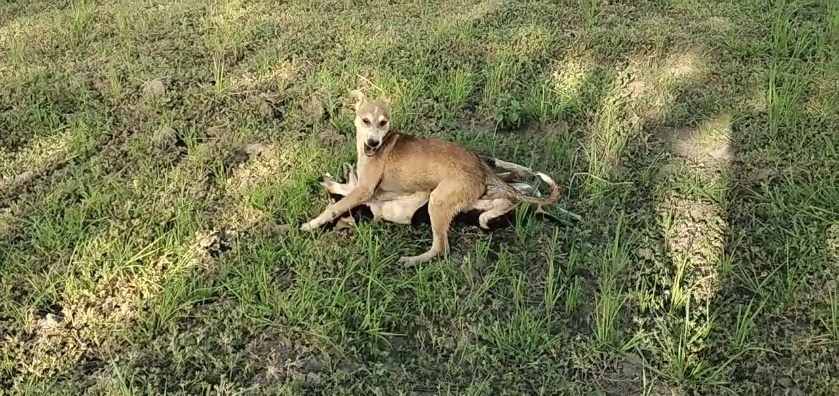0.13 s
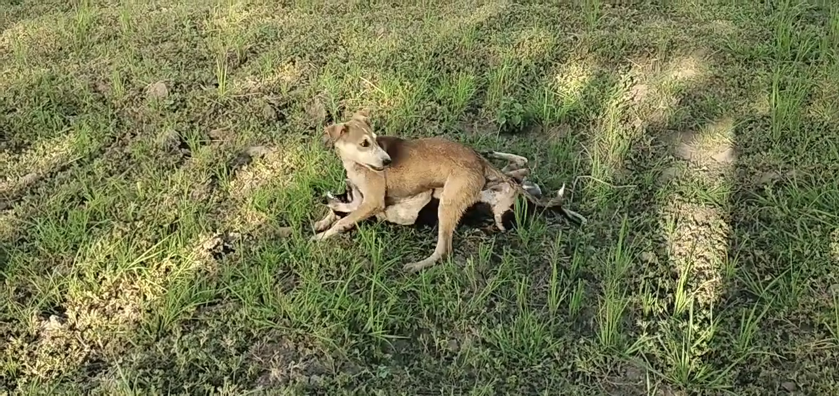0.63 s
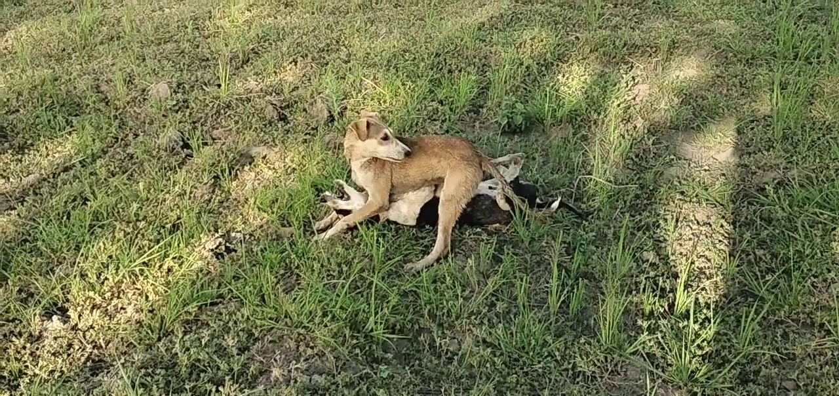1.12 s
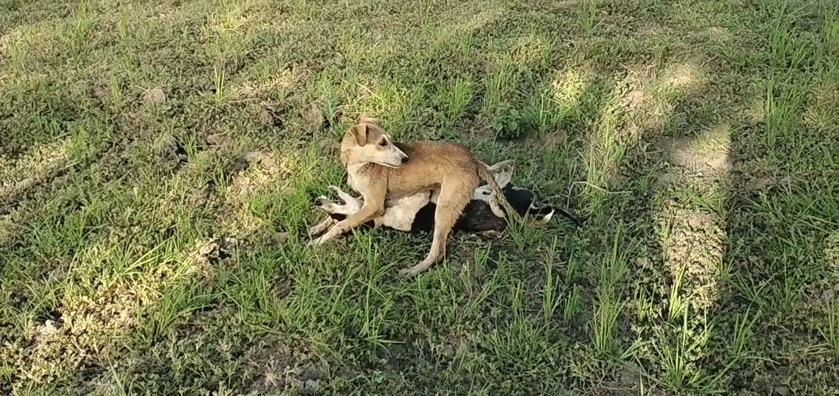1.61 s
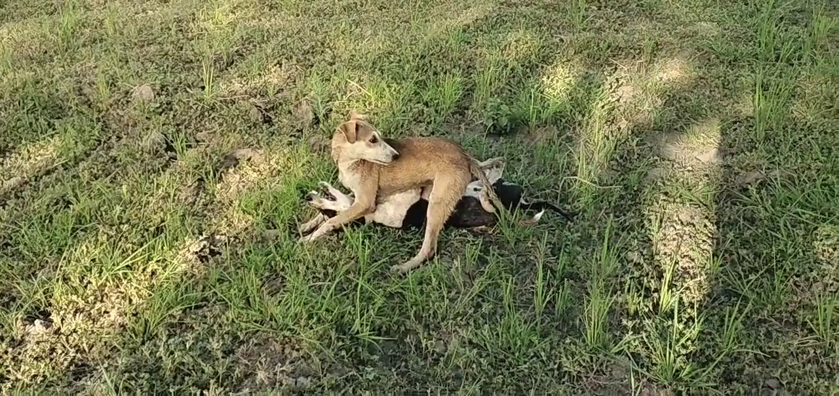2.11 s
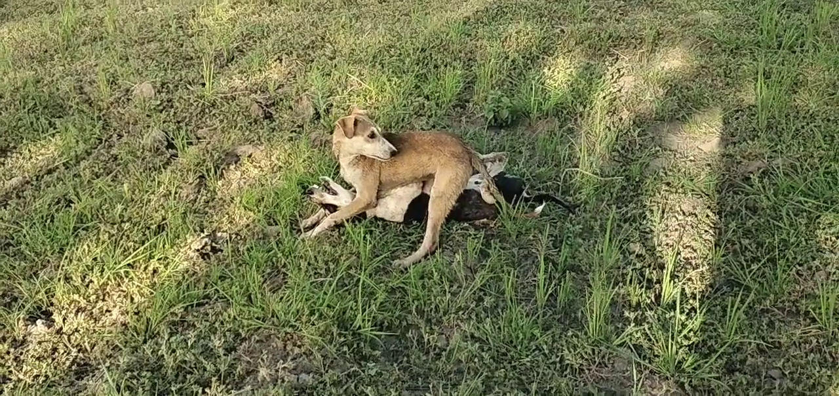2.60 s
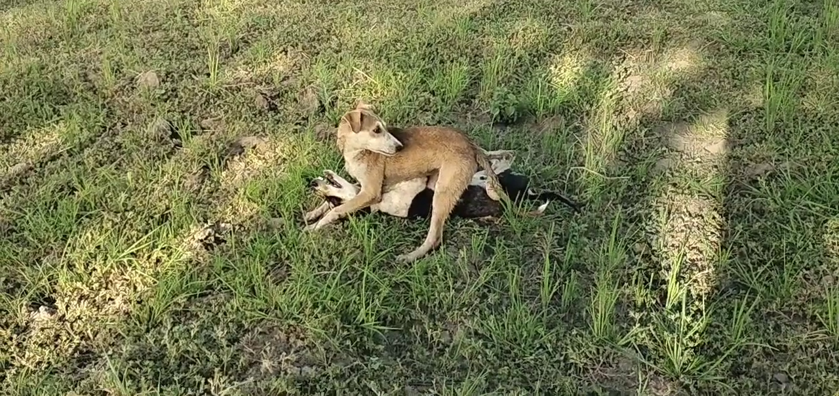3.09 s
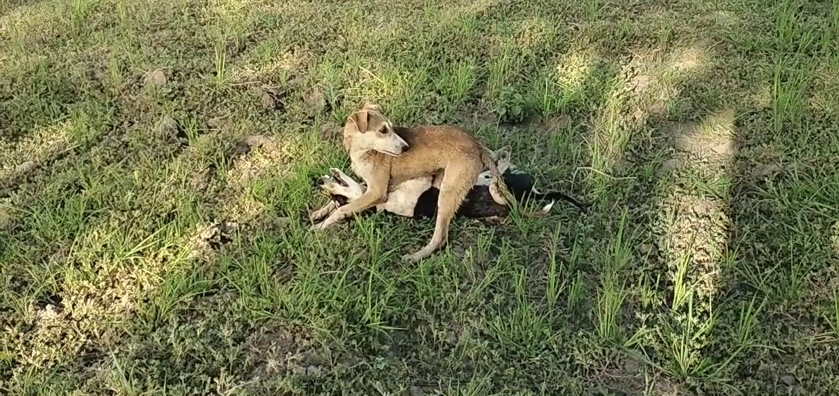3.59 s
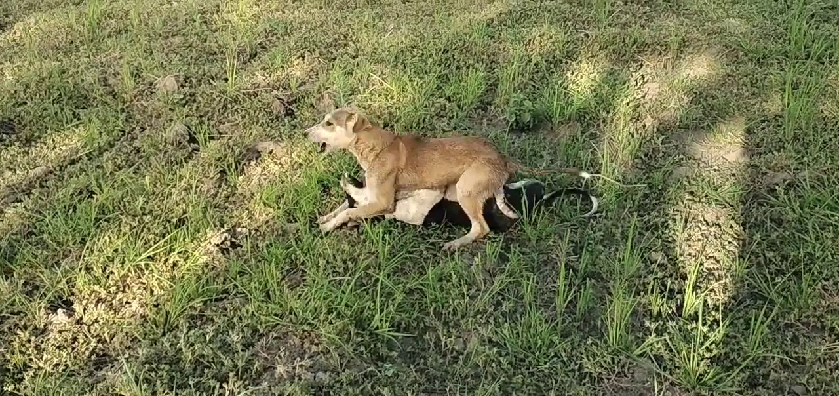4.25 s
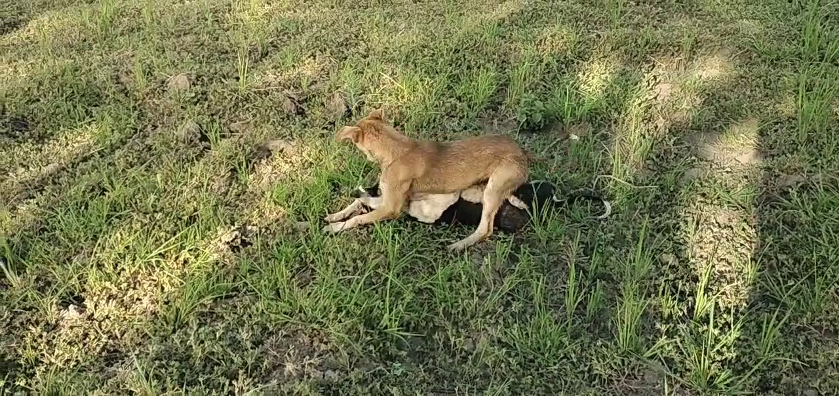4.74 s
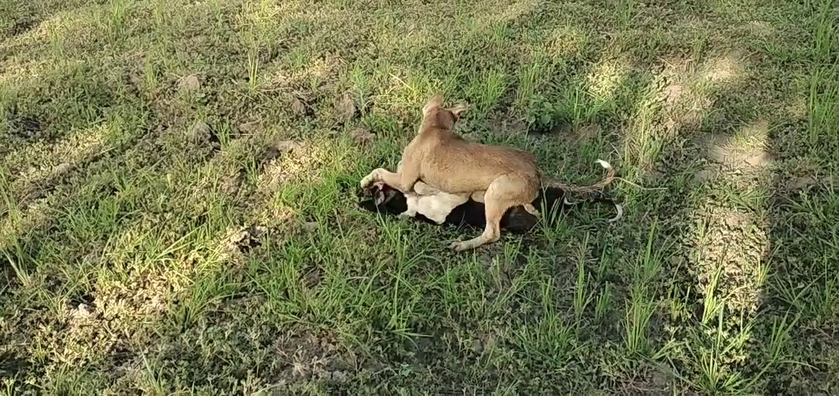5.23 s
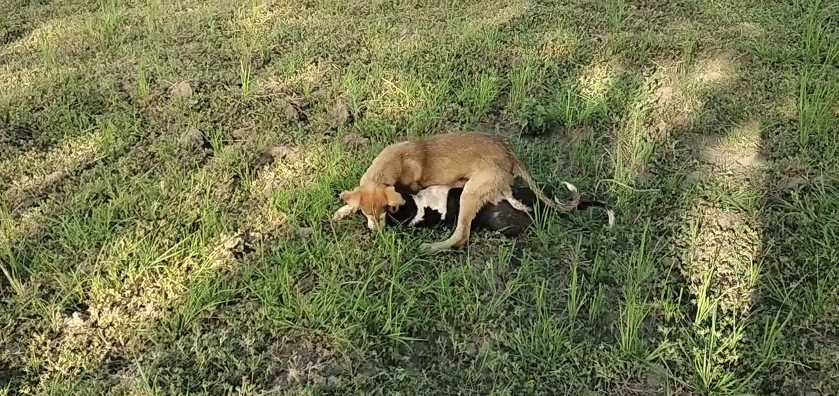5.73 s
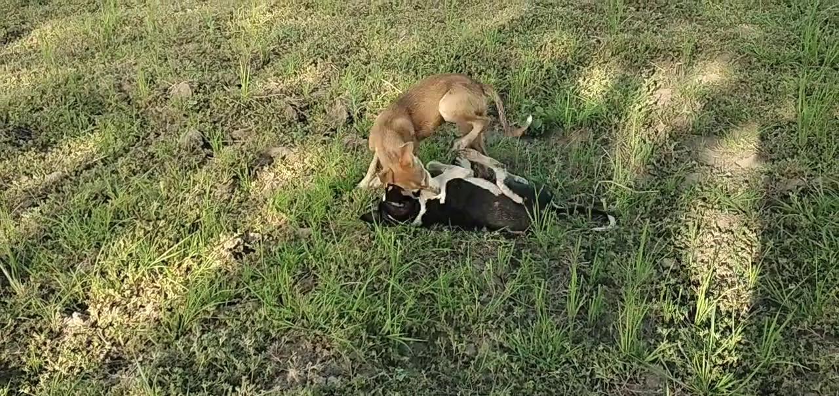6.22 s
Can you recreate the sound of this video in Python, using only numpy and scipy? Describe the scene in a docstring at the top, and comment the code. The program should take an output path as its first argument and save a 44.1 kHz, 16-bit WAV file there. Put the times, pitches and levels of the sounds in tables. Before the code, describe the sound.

Quiet open-air hum, faint twitter, thin insect buzz and a soft engine puttering about four times a second run throughout. A brief coo comes at 0.1 s. At 0.55 s a young dog close by gives a shrill raspy squeal, then short choked yelps sliding down until 1.1 s, with a small upward break at the end; near walls slap it back. From 1.4 to 2.7 s there are dry grass ticks and quick high bird chips, the sharpest at 2.6 s. The squeal phrase repeats at 2.97-3.7 s, brighter, with another coo inside it. A short click sounds at 4.4 s, a grass tick at 4.65 s. The third and loudest phrase runs 4.66-5.4 s, its echo fading. Soft coos recur roughly every second. Small bumps follow, and a fainter raspy call rises at about 6.05-6.25 s.

```python
"""Shrill squeal between near walls

Close to the microphone a shrill two-voiced squeal repeats one phrase three times and rings off near walls, with
a faint dull tail from farther off. It is built from sine partials on gliding pitches, with rasp, breath and brief
catches. Dry ticks of noise in the grass, bird chips, low wind bumps and short clicks of decaying tones, soft
cooing glides and an engine's puffs of noise share the echoes.
Farther off a fainter caller answers and thin chirps glide; noise bands make twitter, insects and country air.
"""
import sys
import numpy as np
from scipy import signal
from scipy.io import wavfile
from scipy.ndimage import uniform_filter1d

SR = 44100
rng = np.random.default_rng(int(sys.argv[2]) if len(sys.argv) > 2 else 0)


def gain_from_db(level_db):
    """Turn a decibel level (scalar or array-like) into a linear amplitude factor."""
    decades = np.asarray(level_db, float) / 20
    return 10 ** decades


def output_pcm(signal):
    """Save a mono or channel-first signal as 16-bit PCM at the path in sys.argv[1].

    Samples are clipped to [-1, 1] before scaling.
    """
    pcm = np.clip(np.atleast_2d(signal).T, -1, 1) * 32767
    wavfile.write(sys.argv[1], SR, np.round(pcm).astype(np.int16))


N = 278712   # samples


def at_hz(points, hz):
    """Reads a spectrum on a log-frequency axis."""
    point_hz, value = np.transpose(points)
    return np.interp(np.log(hz), np.log(point_hz), value)


def band(x, low_hz, high_hz):
    """Second-order Butterworth band-pass."""
    return signal.sosfilt(signal.butter(2, [low_hz, high_hz], "band", fs=SR, output="sos"), x)


def resonate(x, hz, width_hz):
    """One two-pole resonance, gain about 1 on top."""
    r = np.exp(-np.pi * width_hz / SR)
    poles = [1, -2 * r * np.cos(2 * np.pi * hz / SR), r * r]
    return signal.lfilter([(1 - r * r) / 2, 0, (r * r - 1) / 2], poles, x)


def rms_one(x):
    """Scales to unit rms."""
    return x / np.sqrt(np.mean(x ** 2) + 1e-20)


def drift(rate_hz):
    """Random wander of unit rms: noise through a double low-pass at rate_hz."""
    r = np.exp(-2 * np.pi * rate_hz / SR)
    noise = rng.standard_normal(N + SR)
    settled = signal.lfilter([1], [1, -2 * r, r * r], noise)[SR:]
    return rms_one(settled)


def unroll(note, fade_s, release_s):
    """A note's sample indices, its columns in time and its rounded ends."""
    s, *columns = np.transpose(note)
    at = np.arange(round(s[0] * SR), min(round(s[-1] * SR), N))
    ends = np.clip(np.minimum((at - at[0]) / fade_s, (at[-1] - at) / release_s) / SR, 0, 1)
    return at, [np.interp(at / SR, s, c) for c in columns], np.sin(np.pi / 2 * ends) ** 2


RASP_BEAT_HZ = 147.5   # the two voices beat
WAVER, CATCH_WAVER = .0025, .0012   # pitch waver as a share, and what each dB of mean dip adds
CATCH_ROUGH = 0.022   # added roughness per dB of dip
CATCH_BREATH, CATCH_SPAN_S = 1.6, 0.014   # dB more air per dB of mean dip, over this span
# throat and mouth colour every partial: (f/Hz, level/dB)
THROAT = [(1000, -4), (1300, -5.5), (1600, -7), (2100, 6.5), (2400, 3.5), (2650, -2), (3100, -1),
          (3500, -5.5), (3900, 0), (4700, -14), (5200, -12), (6500, -14), (7100, -10), (7900, -14),
          (8500, -28.5), (9100, -30.5), (10000, -47), (12000, -36), (16000, -37)]
# the head points another way in each phrase: (phrase start t/s, its colour as (f/Hz, level/dB))
FACING = [(.5, [(1300, 1), (2600, 1), (3900, -5.5), (5200, 1), (7000, 0.5), (11000, -3)]),
          (2.9, [(1300, 2.25), (2600, 3.2), (3900, 3), (5200, 3.7), (7000, 1.5), (11000, 1.5)]),
          (4.6, [(1300, -8), (2600, 1.5), (3900, 3.3), (5200, 6.5), (7000, -5), (11000, 1.5)])]


def voice(notes, partials_db, rough, breath_db, fade_s, dip_db, shift_hz=0, beat=0):
    """Twelve partials on a wavering pitch; roughness scatters each, the beat throbs the upper ones most."""
    out, waver = np.zeros(N), drift(110)
    scatter = np.array([drift(383) for k in range(4)])
    hiss = band(rng.standard_normal(N), 2500, 6400)
    sheen = band(rng.standard_normal(N), 9500, 20000)
    breath = rms_one(hiss + 0.091 * sheen)
    # a run of catches lets more air through
    strain_db = uniform_filter1d(dip_db, round(CATCH_SPAN_S * SR))
    for note in notes:
        at, (hz, db, tilt_db, first_db), ends = unroll(note, fade_s, release_s=.007)
        facing = [colour for start_s, colour in FACING if start_s < note[0][0]][-1]
        levels_db = []
        for k in range(1, 13):
            weight_db = tilt_db * np.log2(min(k, 6) / 2) if k > 1 else first_db
            colour_db = at_hz(THROAT, k * hz) + at_hz(facing, k * hz)
            levels_db.append(db + partials_db[min(k, 6) - 1] + weight_db + colour_db)
        # a choked voice sags in pitch
        bend = (WAVER - CATCH_WAVER * strain_db[at]) * waver[at] + 0.00676 * dip_db[at]
        turns = np.cumsum(hz * (1 + bend)) / SR
        throb = np.cos(2 * np.pi * np.cumsum(RASP_BEAT_HZ * (1 + 0.033 * waver[at])) / SR)
        for k, level_db in enumerate(levels_db, 1):
            # in the rasp the upper partials hold still, below the first voice's series
            cycles = (k * hz.mean() + shift_hz) * at / SR if shift_hz and k > 2 else k * turns
            share = (min(k, 3) / 3) ** 2   # the lowest partials stay cleanest
            jitter = (rough - CATCH_ROUGH * dip_db[at]) * share * scatter[k % 4, at]
            phase = 2 * np.pi * (cycles + rng.random()) + jitter
            swell = 1 + beat * share * throb + rough * share * scatter[(k + 1) % 4, at]
            swell = swell / np.sqrt(1 + (beat * share) ** 2 / 2 + (rough * share) ** 2)
            audible = k * hz < .45 * SR
            out[at] += np.sqrt(2) * gain_from_db(level_db + dip_db[at]) * audible * ends * swell * np.sin(phase)
        # air rushes with the upper partials, in puffs on the beat
        air_db = np.max(levels_db[2:5], axis=0) + breath_db + 0.22 * dip_db[at] - CATCH_BREATH * strain_db[at]
        out[at] += gain_from_db(air_db) * ends * (1 + beat * throb) * breath[at]
    return out


# first voice, clear notes, as breakpoints: (t/s, pitch f/Hz, level/dB before the throat and facing colours,
# tilt from partial 2 to 6 in dB per octave, weight of the fundamental level/dB)
LOW_VOICE = [
    [(.547, 1388, -45, 1.5, 1), (.555, 1400, -44.5, 1, -1.5), (.565, 1436, -39, 1, -1)],
    [(.708, 1303, -47.5, 0, -1), (.736, 1361, -47.5, 2, 1), (.768, 1301, -48.5, 0, 1.5),
     (.782, 1290, -65, -8, -7)],
    [(.853, 1329, -45, 0, -2.5), (.889, 1307, -50, 2.5, 5), (.909, 1264, -50, -2.5, 2),
     (.933, 1221, -47, -12, -4.5), (.96, 1126, -51, 0, -5), (.994, 1003, -56, -17, -5),
     (1.002, 1020, -66, -5, -8)],
    [(2.974, 1394, -44.5, -2, -4), (2.982, 1385, -46.5, 6.5, 4.5), (2.988, 1430, -41, 0, 8)],
    [(3.206, 1337, -42.5, 0, -2), (3.238, 1297, -47, 4, 1.5), (3.248, 1270, -43.5, -4, -4.5),
     (3.255, 1290, -47, 2, -17)],
    [(3.334, 1298, -46, 1.5, 0), (3.394, 1313, -44.5, 0, 2.5), (3.404, 1336, -50, 0, 0.5),
     (3.416, 1256, -35, -5, -14)],
    [(3.495, 1271, -42, -4, -3), (3.537, 1197, -43, -7, -6), (3.551, 1174, -40.5, -11, -5.5),
     (3.585, 1052, -49, -7, 0), (3.598, 1032, -40, -20, -1)],
    [(4.662, 1450, -32.5, 1, -14), (4.668, 1410, -37, 1, 5), (4.678, 1370, -30.5, -5.5, -2)],
    [(4.901, 1291, -37, -0.5, -2), (4.921, 1289, -33, 0, -2), (4.931, 1266, -32.5, -4, -12),
     (4.946, 1232, -39, 2.5, 6.5)],
    [(5.026, 1309, -32, -3, -2.5), (5.094, 1266, -36, 0, -2), (5.106, 1294, -35, -2, -7),
     (5.115, 1255, -41, 0, 15)],
    [(5.194, 1265, -33, -4, 1.5), (5.206, 1231, -35, -2, -1.5), (5.224, 1203, -31.5, -7, -3),
     (5.245, 1156, -33, -10, -10), (5.257, 1138, -39, 1, -6.5), (5.283, 1050, -38.5, -20, 3.5),
     (5.295, 995, -36.5, -25, -4.5)],
]
# second voice, overlapping the ends of notes: the same columns, before HIGH_PARTIALS too
HIGH_VOICE = [
    [(.595, 1690, -33.5, -7, -43), (.605, 1790, -42.5, 0, -28), (.613, 1730, -29, -14, -40)],
    [(.96, 1269, -59, -3, -18), (.975, 1280, -70, 2, -15), (1.004, 1256, -69, 4, 6),
     (1.02, 1295, -57, 4, -1), (1.05, 1473, -55, -8, 5.5), (1.066, 1646, -53.5, 13.5, -7),
     (1.078, 1666, -48, 8, -7)],
    [(3.052, 1840, -48, 9, -22), (3.06, 1813, -34.5, 5, -15), (3.066, 1794, -41.5, 4, -2.5),
     (3.07, 1805, -43, -3, -22)],
    [(3.56, 1305, -64, 7, -21), (3.6, 1174, -65.5, 4, 9.5), (3.612, 1304, -73, 4, 19.5),
     (3.63, 1313, -48, -20, -10), (3.668, 1576, -46.5, 4, 4.5), (3.68, 1645, -44, 9, 2),
     (3.696, 1536, -61, 2, -14)],
    [(4.747, 1790, -47, 13, -9), (4.753, 1835, -32, 5, -13), (4.759, 1788, -28.5, 12, -12.5),
     (4.764, 1765, -38, -6, 20)],
    [(5.255, 1416, -43, -12.5, -27.5), (5.299, 1269, -51.5, -13, 15.5), (5.309, 1263, -63.5, 1, 20),
     (5.32, 1278, -54.5, -3, 21), (5.332, 1302, -48.5, -11, -1), (5.348, 1438, -35, -17, 10),
     (5.36, 1530, -48, 13, 21), (5.372, 1629, -39.5, 21.5, -37), (5.386, 1540, -39.5, -9, -19),
     (5.392, 1580, -43, -5, 0)],
]
# the raspy body of each opening note: the same columns, before RASP_PARTIALS too
RASP = [
    [(.56, 1420, -41, -3, -3), (.572, 1466, -45.5, 2, 3), (.596, 1489, -56.5, 12, 8),
     (.61, 1417, -31.5, -13, -6)],
    [(2.984, 1425, -35, -3, -1), (2.996, 1456, -39.5, -2.5, -1), (3.018, 1489, -35.5, 0.5, -1),
     (3.044, 1534, -45.5, 9, 8), (3.058, 1508, -47, 13.5, 10)],
    [(4.673, 1384, -19, -7.5, 3), (4.681, 1491, -37, 6, 10), (4.693, 1498, -30, 1.5, 9),
     (4.731, 1481, -33.5, 6.5, 13), (4.756, 1568, -43.5, 17.5, 22)],
]
# what each adds to its partials 1 to 6, the sixth holding for all above: (level/dB)
HIGH_PARTIALS = [10, 0.86, -2, -3, -20.5, -25]
RASP_PARTIALS = [-3.5, 1.5, -7, -2, -0.8, -1.5]
# quick runs of catches at the start of notes: (first t/s, last t/s, first dip level/dB, last dip level/dB)
CATCHES = [(0.718, 0.761, -17.5, -13), (0.862, 0.908, -16.5, -12.5), (3.216, 3.229, -29.5, -10.5),
           (3.346, 3.386, -20.5, -15.5), (3.502, 3.52, -14.5, -17), (4.912, 4.923, -20, -10.5),
           (5.036, 5.08, -21, -12), (5.203, 5.212, -3.5, -11.5)]
CATCH_S, CATCH_EVERY_S = 0.0031, .013
CLEAR_ROUGH, CLEAR_BREATH_DB = .15, -28.0


def squeal():
    """Both voices and the rasp; the catches choke the first voice for a few milliseconds."""
    t, dip_db, steady = np.arange(N) / SR, np.zeros(N), np.zeros(N)
    for first_s, last_s, first_db, last_db in CATCHES:
        count = round((last_s - first_s) / CATCH_EVERY_S) + 1
        for s, db in np.linspace((first_s, first_db), (last_s, last_db), count):
            near = slice(round((s - .01) * SR), round((s + .01) * SR))
            # it sinks slowly and snaps back
            width_s = np.where(t[near] < s, CATCH_S, CATCH_S / 3)
            dip_db[near] += db * np.exp(-((t[near] - s) / width_s) ** 2)
    low = voice(LOW_VOICE, np.zeros(6), rough=CLEAR_ROUGH, breath_db=CLEAR_BREATH_DB, fade_s=.0006,
                dip_db=dip_db)
    high = voice(HIGH_VOICE, HIGH_PARTIALS, rough=CLEAR_ROUGH, breath_db=CLEAR_BREATH_DB, fade_s=0.0013,
                 dip_db=steady)
    # the rasp's upper partials sit flat
    rasp = voice(RASP, RASP_PARTIALS, rough=.6, breath_db=-2.0, fade_s=0.0064, dip_db=steady,
                 shift_hz=-480.0, beat=.45)
    # the voices keep little below about 900 Hz
    return signal.sosfilt(signal.butter(4, 900, "high", fs=SR, output="sos"), low + high + rasp)


# dry ticks in the grass: (t/s, onset level/dB, low edge f/Hz, high edge f/Hz)
TICKS = [(1.426, -65, 3530, 9300), (1.454, -70, 3400, 9500), (1.607, -71.5, 6000, 9350),
         (1.676, -63.5, 2920, 8800), (2.094, -62.5, 3430, 8400), (2.559, -69, 2800, 5500),
         (4.112, -71, 2480, 4470), (4.649, -52.5, 1010, 4400), (5.99, -73, 9900, 15000)]


def ticks():
    """Each tick is a burst of band-passed noise that dies within some 35 milliseconds."""
    out, t = np.zeros(N), np.arange(SR // 20) / SR
    for s, db, low_hz, high_hz in TICKS:
        grit = band(band(rng.standard_normal(len(t)), low_hz, high_hz), low_hz, high_hz)
        out[round(s * SR):][:len(t)] += gain_from_db(db - 60 * t / 0.035) * rms_one(grit)
    return out


def pips(events):
    """Short tones that swell in a millisecond or two and die, sagging in pitch."""
    out, t = np.zeros(N + SR), np.arange(SR // 5) / SR
    for s, db, hz, t60 in events:
        shape = (1 - np.exp(-t / 0.0015)) * gain_from_db(-60 * t / max(t60, .004))
        tone = np.sin(2 * np.pi * hz * t * (1 - 1.4 * t))
        out[round(s * SR):][:len(t)] += gain_from_db(db) * shape / shape.max() * tone
    return out[:N]


# small bird chips: (t/s, peak level/dB, starting f/Hz, 60 dB decay t/s)
CHIPS = [(1.552, -68, 3770, 0.028), (1.5783, -56.5, 3860, 0.041), (1.8552, -62, 3840, 0.066),
         (1.8811, -56.5, 3870, 0.029), (2.1485, -61, 3720, 0.058), (2.176, -55, 3900, 0.04),
         (2.4314, -67, 3730, 0.04), (2.4578, -61, 3740, 0.034), (2.4838, -53, 3860, 0.034),
         (2.603, -42.5, 3810, 0.013), (2.6848, -70, 4570, 0.026), (2.7162, -70, 6950, 0.034)]


def chips():
    """Small birds chip: high tones that decay fast."""
    return pips(CHIPS)


# soft low wind bumps near 250-310 Hz and short clicks near 1.3 kHz:
# (t/s, peak level/dB, starting f/Hz, 60 dB decay t/s)
BUMPS_AND_CLICKS = [(2.274, -64, 243, 0.067), (3.67, -69, 249, 0.24), (3.755, -63, 286, 0.025),
                    (4.374, -69.5, 1317, 0.028), (4.394, -42.5, 1325, 0.016), (4.419, -64, 1270, 0.024),
                    (5.36, -61.5, 243, 0.061), (5.415, -57, 284, 0.017), (5.785, -52, 313, 0.0095),
                    (5.809, -55.5, 1440, 0.042)]


def bumps_and_clicks():
    """Soft low wind bumps and short clicks, each one decaying tone."""
    return pips(BUMPS_AND_CLICKS)


def arcs(calls, swell, start_hz=None):
    """Each call swells to its top and sinks; pitch glides straight, or scoops up from start_hz first."""
    share, start_db, end_db = swell
    notes = []
    for s, length, a_hz, last_hz, db in calls:
        top_hz = a_hz if start_hz else a_hz + share * (last_hz - a_hz)
        notes.append([(s, start_hz or a_hz, db + start_db),
                      (s + share * length, top_hz, db),
                      (s + length, last_hz, db + end_db)])
    return notes


def whistles(notes, rough, fade_s):
    """Near sines, blurred by distance: phase and level wander at random."""
    out, blur, sway = np.zeros(N), drift(150), drift(49)
    for note in notes:
        at, (hz, db), ends = unroll(note, fade_s, fade_s)
        phase = 2 * np.pi * np.cumsum(hz) / SR + rough * blur[at]
        sway_db = 4.0 * rough * sway[at]
        out[at] += np.sqrt(2) * gain_from_db(db + sway_db) * ends * np.sin(phase)
    return out


# soft coos: (start t/s, length t/s, f/Hz at the loudest, last f/Hz, top level/dB before the sway)
COOS = [(.11, 0.056, 986, 960, -53.5), (1.24, 0.058, 987, 1100, -55), (2.31, 0.052, 986, 1090, -56),
        (3.41, 0.049, 990, 1030, -52), (4.43, .055, 980, 1060, -55.5), (5.83, 0.057, 975, 960, -55)]
# (share of the length to the top, start level/dB, end level/dB), levels against the top
COO_SWELL = (.65, -20, -9)


def coos():
    """Soft coos: near sines that scoop up in pitch as they swell."""
    return whistles(arcs(COOS, COO_SWELL, start_hz=860), rough=0.19, fade_s=0.0035)


# how loud the engine arrives: (t/s, chuff level/dB, thump level/dB), both before trims and spread
FIRINGS = [(.2, -51.5, -58), (.44, -51.5, -71), (.67, -52, -59.5), (.9, -59, -63), (1.12, -48.5, -61.5),
           (1.599, -57.5, -68.5), (2.1, -51, -62), (2.5, -56, -61.5), (2.9, -63.5, -71), (3.4, -43.5, -72),
           (3.7, -54, -53), (4.06, -52.5, -74.5), (4.5, -50, -68), (5.1, -53.5, -67.5), (5.4, -47.5, -62.5),
           (5.65, -54, -62), (6.1, -51, -66)]
# exhaust resonances: (f/Hz, width f/Hz, relative level/dB)
EXHAUST = [(1840, 410, 12.5), (2213, 540, 4.5), (2790, 193, 8), (4290, 1200, -47.5)]
FIRST_FIRING_S, FIRING_EVERY_S = .2135, .2259
CHUFF_S, THUMP_S, THUMP_SPREAD_DB = .0055, .0079, 3.5   # times to the top, and chance from firing to firing


def engine():
    """Each firing puffs noise through the exhaust and pushes a low lumpy thump."""
    chuff, thump, t = np.zeros(N + SR), np.zeros(N + SR), np.arange(SR // 4) / SR
    when, chuffs_db, thumps_db = np.transpose(FIRINGS)
    for s in np.arange(FIRST_FIRING_S, N / SR, FIRING_EVERY_S):
        chuff_db = np.interp(s, when, chuffs_db) - 2.5
        thump_db = np.interp(s, when, thumps_db) + THUMP_SPREAD_DB * rng.standard_normal() + 2.0
        here = slice(round(s * SR), round(s * SR) + len(t))
        chuff[here] += gain_from_db(chuff_db) * t / CHUFF_S * np.exp(1 - t / CHUFF_S)
        push = np.sin(2 * np.pi * (rng.uniform(80, 116.6) * t + rng.random()))
        thump[here] += gain_from_db(thump_db) * t / THUMP_S * np.exp(1 - t / THUMP_S) * push
    puff = band(band(rng.standard_normal(N), 1200, 4600), 1200, 5000)
    # neighbouring resonances take opposite signs
    pipe = rms_one(sum(gain_from_db(db) * resonate(puff, hz, width) * (-1) ** k
                       for k, (hz, width, db) in enumerate(EXHAUST)))
    lumps = gain_from_db(5.8 * drift(29))
    return chuff[:N] * pipe + thump[:N] * lumps


# the fainter caller's strong partial: (start t/s, length t/s, first f/Hz, last f/Hz, top level/dB before the sway)
FAR_CALLS = [(.39, 0.035, 2785, 2680, -69.5), (.49, 0.072, 2797, 2910, -68),
             (1.48, 0.17, 2900, 2830, -77.5), (2.83, 0.057, 2810, 2895, -71), (4.1, .09, 2560, 2240, -76),
             (5.73, 0.055, 2730, 2800, -69), (6.065, 0.19, 2726, 3020, -60)]
# (share of the length to the top, start level/dB, end level/dB), levels against the top
FAR_SWELL = (.6, -7, -6)


def far_calls():
    """The fainter caller's strong partial: a gliding near sine, heavily blurred by distance."""
    return whistles(arcs(FAR_CALLS, FAR_SWELL), rough=.75, fade_s=0.0074)


# the fainter caller's rasp: (start t/s, length t/s, hiss level/dB)
FAR_RASP = (6.05, .195, -63)


def far_rasp():
    """Hiss around three partials, puffing on the beat."""
    out, noise = np.zeros(N), band(band(rng.standard_normal(N), 2500, 5600), 2500, 5300)
    partials = ((2870, 14), (3800, 6), (4800, 5))   # (f/Hz, relative level/dB)
    hiss = rms_one(sum(gain_from_db(db) * resonate(noise, hz, 410) for hz, db in partials))
    s, length, hiss_db = FAR_RASP
    at, (db,), ends = unroll([(s, hiss_db), (s + length, hiss_db)], fade_s=0.023, release_s=0.025)
    puffs = 1 + 0.27 * np.cos(2 * np.pi * RASP_BEAT_HZ * at / SR)
    out[at] = gain_from_db(db) * ends * hiss[at] * puffs
    return out


# thin far chirps, mostly falling: (start t/s, length t/s, first f/Hz, last f/Hz, top level/dB before the sway)
CHIRPS = [(.375, .03, 6130, 5840, -91), (.435, .04, 6220, 5500, -85), (2.275, 0.032, 5100, 4790, -74),
          (2.325, .025, 6070, 5600, -77), (2.385, .025, 6100, 5730, -86), (2.585, .035, 5100, 4900, -77),
          (2.83, 0.061, 4100, 3880, -79), (4.49, 0.042, 3380, 3500, -70.5), (5.56, .035, 6220, 6020, -78),
          (5.775, .05, 3400, 3600, -69)]
# (share of the length to the top, start level/dB, end level/dB), levels against the top
CHIRP_SWELL = (.5, -3, 0)


def chirps():
    """Thin far chirps: short gliding near sines with soft ends."""
    return whistles(arcs(CHIRPS, CHIRP_SWELL), rough=0.28, fade_s=0.014)


# the caller turns, so more or less goes by the walls: (t/s, send level/dB before the wall levels)
TURNING = [(0, -21), (.8, -0.5), (2, -16), (3.4, -4), (4.198, -15), (5.1, -5.5), (6.32, -30.5)]
EARLY_DB, EARLY_T60_S, LATE_DB, LATE_T60_S, ECHO_HZ = -4.5, 0.54, -21.5, 0.78, 2844
FIRST_WALL_S, WALL_S = .011, 0.049   # nearest wall; the farthest near wall answers after WALL_S
SLAPS_DB = 3.5   # unevenness of the slaps


def echoes(x):
    """Near walls answer in uneven slaps, then fall away, with a faint dull tail from farther off."""
    t = np.arange(SR) / SR
    noise = rng.standard_normal((2, SR)) * np.clip((t - FIRST_WALL_S) / 0.0013, 0, 1)
    mids = resonate(resonate(noise[0], ECHO_HZ, width_hz=1300), ECHO_HZ, width_hz=1300)
    wide = band(noise[0], 2170, 11350) * gain_from_db(-60 * t / 6.3)   # the wide band dies sooner
    bright = mids + gain_from_db(-3.5) * wide
    past_wall_db = -7.0 * np.clip((t - WALL_S) / 0.0059, 0, 1)
    early = rms_one(bright * gain_from_db(-60 * t / EARLY_T60_S + past_wall_db + SLAPS_DB * drift(54)[:SR]))
    late = rms_one(band(noise[1], 1500, 4900) * gain_from_db(-60 * t / LATE_T60_S))
    tail = (gain_from_db(EARLY_DB) * early + gain_from_db(LATE_DB) * late) / np.sqrt(SR)
    sent = x * gain_from_db(np.interp(np.arange(N) / SR, *np.transpose(TURNING)))
    return signal.fftconvolve(sent, tail)[:N]


def twitter():
    """Faint far birds: narrow noise bands that come and go at random."""
    noise, out = rng.standard_normal(N), 0
    for hz in np.geomspace(1300, 4300, 9):
        line = rms_one(resonate(resonate(noise, hz, width_hz=480), hz, width_hz=480))
        level_db = -90.0 + 4.9 * np.minimum(drift(4.1), 1.8)
        out = out + gain_from_db(level_db) * line
    return out


# insects: (t/s, lower singer level/dB, upper singer level/dB)
INSECTS = [(0, -106, -96), (.6, -100, -90), (1.3, -96, -97), (1.5, -91, -95), (2.0, -89, -96),
           (2.2, -100, -89.5), (2.9, -104, -92.5), (3.8, -88.5, -90.5), (4.148, -83.5, -103),
           (4.2, -95, -100), (5.6, -91.5, -102), (6.001, -85.5, -92), (6.32, -80, -92)]


def insects():
    """Two narrow songs of resonant noise; the wing strokes pulse them."""
    t = np.arange(N) / SR
    s, lower_db, upper_db = np.transpose(INSECTS)
    out = 0
    for db, hz, width_hz, strokes_hz in ((lower_db, 7250, 220, 110), (upper_db, 9280, 120, 60)):
        song = resonate(resonate(rng.standard_normal(N), hz, width_hz), hz, width_hz)
        strokes = 1 + 0.72 * np.cos(2 * np.pi * strokes_hz * t)
        out = out + gain_from_db(np.interp(t, s, db)) * rms_one(song * strokes)
    return out


# spectrum of the open country: (f/Hz, relative level/dB per Hz)
AIR = [(15, -44), (25, -28), (92, 1.5), (195, -12.5), (344, -12), (695, -12), (988, -5.5), (1400, -7.5),
       (2840, -14), (4030, -18.5), (6210, -31), (9070, -27.5), (10100, -38), (14800, -27.5), (16000, -36)]


def air(patchy_db):
    """Distant country hum and rustle in third-octave bands, each flickering a little."""
    out, together, edges = 0, drift(1.0), 25 * 2 ** np.arange(0, 9.5, 1 / 3)
    white, flicker = rng.standard_normal((2, N)), [drift(7.9) for k in range(5)]
    for k, (low, high) in enumerate(zip(edges, edges[1:])):
        db = at_hz(AIR, np.sqrt(low * high)) + patchy_db * (.5 * together + flicker[k % 5])
        out = out + gain_from_db(db) * band(white[k % 2], low, high)
    return gain_from_db(-69) * rms_one(out)


def scene():
    """Near and far calls and the engine share the echoes; twitter, insects and air come from everywhere."""
    near = squeal() + ticks() + coos() + chips() + bumps_and_clicks() + engine()
    far = far_calls() + far_rasp() + chirps()
    walls = echoes(near + gain_from_db(6.5) * far)   # far sounds reach the walls more strongly
    mix = near + far + walls + twitter() + insects() + air(patchy_db=1.0)
    return mix[None]


def roll_off(x):
    """The treble ends steeply here."""
    return signal.sosfilt(signal.butter(12, 16410, fs=SR, output="sos"), x)


def record(dry):
    """The microphone loses the deepest bass, and the top is cut steeply."""
    x = signal.sosfilt(signal.butter(2, 45, "high", fs=SR, output="sos"), dry)
    x = signal.sosfilt(signal.cheby2(12, 60, 16500, fs=SR, output="sos"), x)   # 60 dB down from 16500 Hz
    return roll_off(x)


dry = scene()
out = record(dry)
output_pcm(out)
```